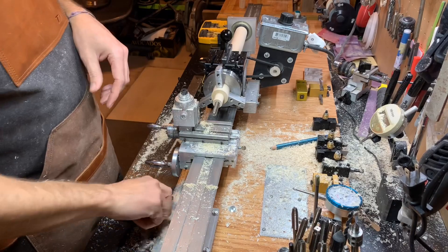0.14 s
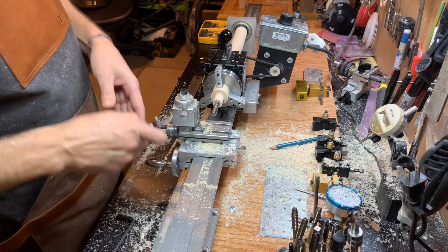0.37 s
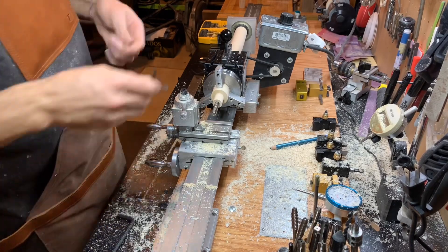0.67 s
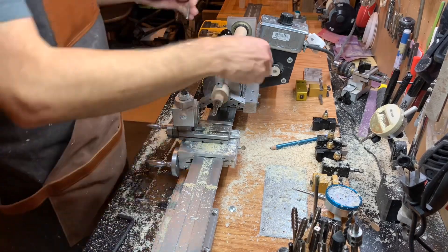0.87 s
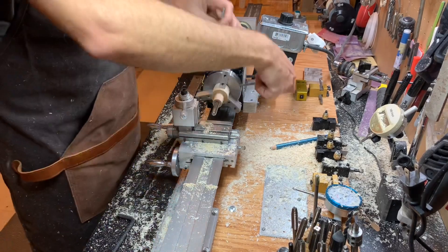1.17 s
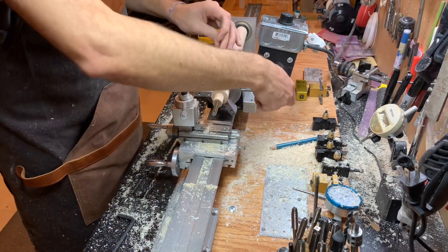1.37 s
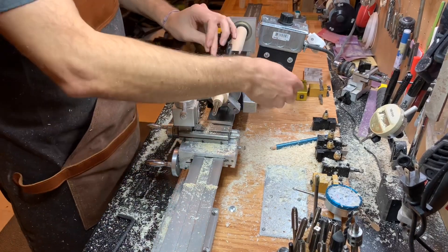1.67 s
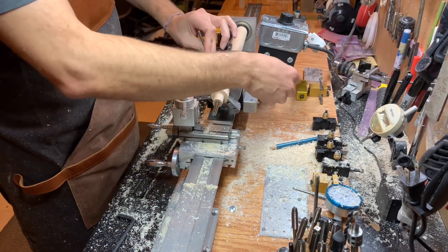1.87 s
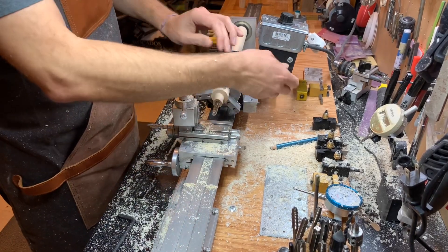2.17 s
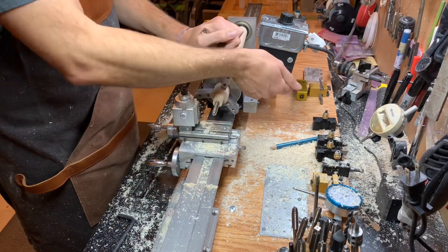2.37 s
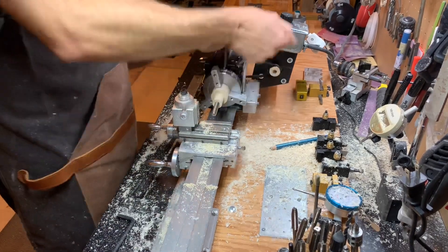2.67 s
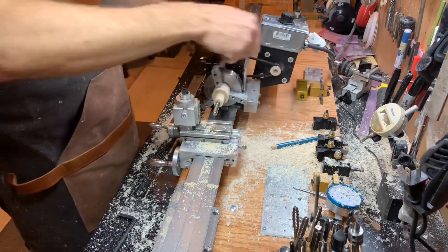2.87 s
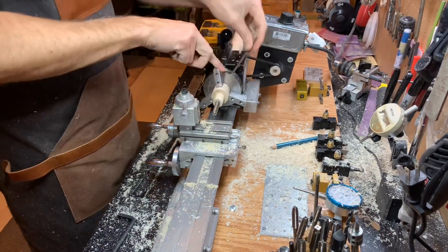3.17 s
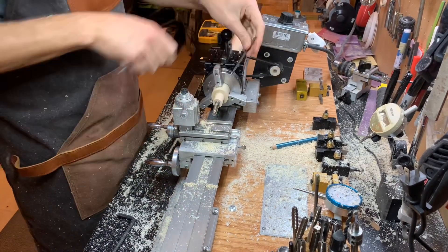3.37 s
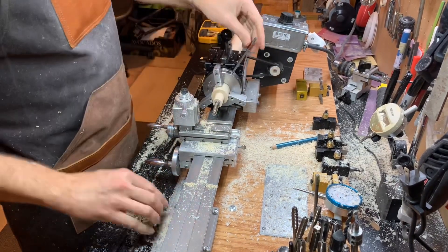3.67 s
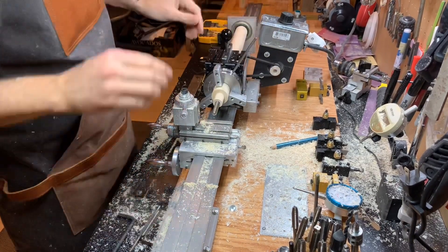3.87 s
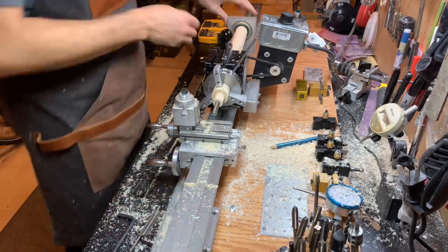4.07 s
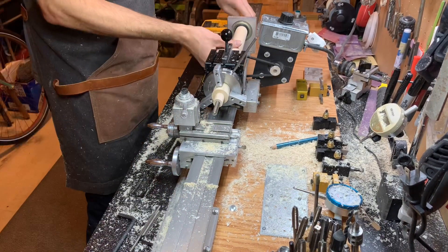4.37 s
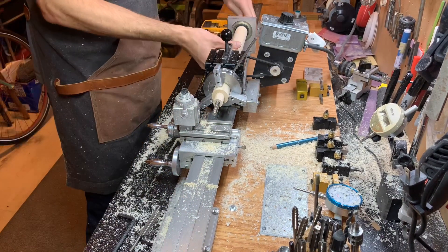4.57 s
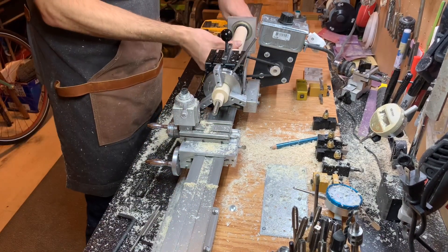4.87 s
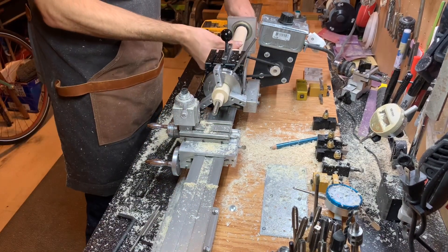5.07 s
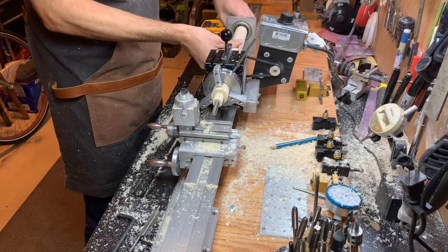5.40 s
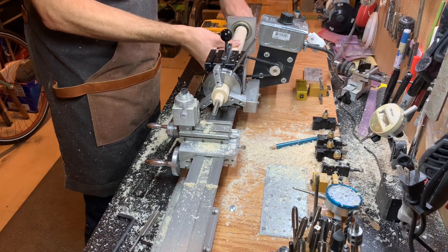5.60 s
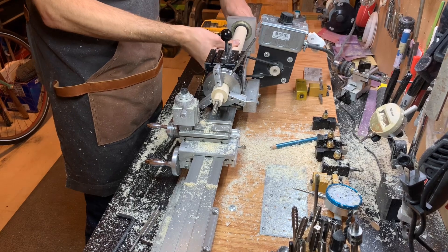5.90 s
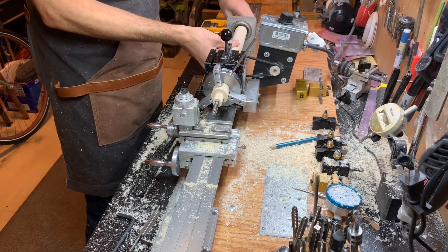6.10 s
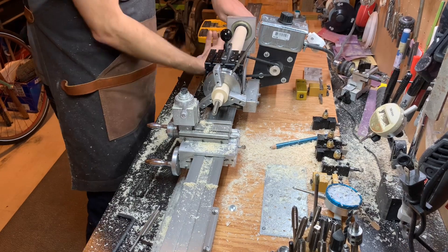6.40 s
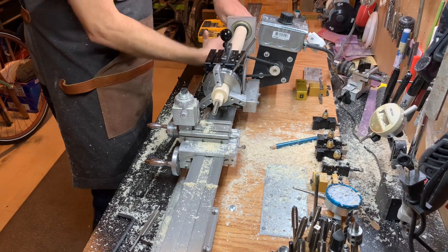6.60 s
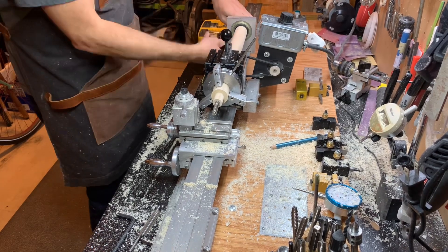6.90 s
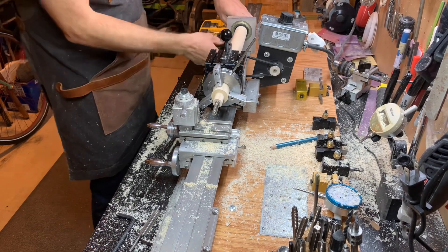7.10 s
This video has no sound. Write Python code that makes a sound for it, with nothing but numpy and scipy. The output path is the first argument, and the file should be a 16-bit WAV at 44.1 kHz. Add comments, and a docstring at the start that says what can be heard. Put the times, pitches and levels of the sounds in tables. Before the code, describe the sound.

Sharp metallic clacks and small clicks at a workbench, then a heavy bump, ticking and a loose hollow object rattling slowly to rest.

```python
"""A small, dry workshop, one microphone just above a cluttered lathe bench; a soft hum runs throughout.
First steel clacks, the frame knocks, hands and apron brush past, and light parts click on the spindle.
Then a bump shakes the bench: the spindle ticks, and a loose thing rattles and rocks on until it rests.
Meanwhile comes the hardest clack, then scrapes and a strong rub; late on, the bench shakes and ticks again.
Hits are noise bursts, partials or falling tones through resonant bodies; rubs and rumble are shaped noise."""
import sys
import numpy as np
from scipy import signal
from scipy.fft import rfft, irfft, next_fast_len
from scipy.io import wavfile
from scipy.ndimage import map_coordinates

SR = 44100
rng = np.random.default_rng(int(sys.argv[2]) if len(sys.argv) > 2 else 0)


def digitize_waveform(pressure):
    """Quantize a signal to 16-bit integers and store it at the path in sys.argv[1].

    Rows of a 2-D input are taken as channels; values are limited to [-1, 1].
    """
    field = np.atleast_2d(pressure).T
    bounded = np.clip(field, -1, 1)
    quanta = np.round(bounded * 32767).astype(np.int16)
    wavfile.write(sys.argv[1], SR, quanta)


N = 319725

# Levels are relative: each layer has a further gain. A hit's level is that of its main band over its
# first 20 ms, and its other registers are in dB relative to that band.

# Steady hum. Each row: frequency in Hz, rms level in dB.
HUM = [(120, -66.5), (240, -71), (479.5, -63.5)]
# Colour of the room's air noise. Each row: frequency in Hz, level in dB.
AIR_COLOUR = [(15, -63.5), (25, -27), (134, -2.5), (212, -11), (242, -8.5), (277, -20.5), (326, -10.5),
              (373, -20.5), (476, -18.5), (516, -20.5), (796, -28.5), (2350, -34.5), (8830, -43),
              (11900, -44.5), (16000, -45)]
# Resonances of the room. Each row: frequency in Hz, width in Hz, lift in dB.
ROOM_MODES = [(128, 30, 2.12), (239, 64, 3), (486, 30, 1.3), (683, 70, 4.5)]
# Dying away of the room. Each row: frequency in Hz, time to fall 60 dB in seconds.
ROOM_DECAY = [(100, 0.51), (400, 0.2), (1000, 0.21), (3000, 0.17), (7500, 0.18), (15000, 0.14)]

# The bench shudders. Each row: start in seconds, attack in seconds, hold in seconds, release in dB per
# second, rumble in dB, clatter in dB relative to it, sifting chips in dB relative to it.
SHUDDERS = [(2.56, 0.034, 0.076, 26.5, -35.5, -10, -12), (3.79, 0.071, 0.34, 172, -47, -4, -6),
            (6.6, 0.17, 0.081, 31.6, -54, 0.5, -2.5)]
# Colour of the bench's rumble. Each row: frequency in Hz, level in dB.
RUMBLE_COLOUR = [(25, -21.5), (60, -6), (120, -12), (230, 7), (300, -1.5), (420, 5.5), (600, -21),
                 (1200, -52.5)]
# Colour of the clutter. Each row: frequency in Hz, level in dB.
CLATTER_COLOUR = [(300, -31), (520, 5), (680, 0), (1000, 9), (1600, -10), (2100, -28.5), (4000, -28.5)]
# Colour of loose chips. Each row: frequency in Hz, level in dB.
CHIPS_COLOUR = [(900, -19), (2000, 2.5), (4000, -1.5), (6500, -4), (10000, -8), (16000, -13)]

# Strokes of hands and apron. Each row: start in seconds, attack in seconds, hold in seconds,
# release in dB per second, rustle in dB, hiss in dB relative to it.
STROKES = [(0.29, 0.06, 0.03, 191, -71, 5.5), (0.505, 0.04, 0.28, 100, -69, 0),
           (2.19, 0.012, 0.1, 50, -63.5, 0.5), (2.472, 0.03, 0.018, 200, -61.5, -1),
           (3.326, 0.14, 0.047, 297.5, -61, 0.5), (3.745, 0.034, 0.073, 305, -58.5, 0.5),
           (4.085, 0.043, 0.055, 220.5, -39, 1.5), (4.652, 0.046, 0.11, 40, -65, -6),
           (5.23, 0.033, 0.13, 97, -68.5, -2.5), (6.203, 0.049, 0.12, 78, -60.5, -3.5),
           (6.508, 0.047, 0.01, 222, -53.5, 0.5), (6.612, 0.015, 0.01, 168, -50.5, -3),
           (6.753, 0.031, 0.029, 283, -51, 4)]
# Colour of the coarse rustle. Each row: frequency in Hz, level in dB.
RUSTLE_COLOUR = [(700, -18), (1500, 0), (2200, -1), (3500, -3), (5000, -3), (6500, -7.5), (9000, -17.5),
                 (14000, -43)]
# Colour of the fine hiss. Each row: frequency in Hz, level in dB.
HISS_COLOUR = [(3500, -21), (6500, 0), (8500, -3), (11000, -1.5), (14500, -2.5), (16000, -8.5)]
# Resonances in the rustle. Each row: frequency in Hz, width in Hz, lift in dB.
RUB_MODES = [(2420, 250, 2.5), (3630, 1100, 4.9), (4880, 350, 1.13), (6180, 900, 2.6)]

# Short gritty scrapes. Each row: start in seconds, level in dB, body in dB, top in dB.
SCRAPES = [(0.1124, -41, 4, -2), (0.898, -53, 2, -6), (1.001, -51, 7, -15), (1.787, -51, 1, -7),
           (3.8681, -32.5, -5.5, -17), (3.9477, -32.5, -8, -12.5), (4.0011, -28.5, -4, -17.5),
           (4.06, -41, -22, -20), (5.4855, -51.5, 0.5, -7), (6.6272, -53.5, 7.5, 8.5)]
# Colour of grit. Each row: frequency in Hz, level in dB.
GRIT_COLOUR = [(150, -36), (250, -9), (330, -9.5), (444, -6.5), (890, -11.5), (1260, -12), (1350, -10),
               (2130, -2), (3280, -7), (5930, -11.5), (16000, -20)]
# Resonances of grit and chips. Each row: frequency in Hz, width in Hz, lift in dB.
GRIT_MODES = [(1530, 160, 1), (2250, 500, 2.8), (3400, 170, 3)]

# Soft bumps on the bench. Each row: start in seconds, level in dB, knock in dB, leading mode in Hz.
BUMPS = [(2.563, -24, -8.5, 159), (2.604, -34.5, -8, 115), (2.686, -40, -7, 205), (2.807, -33, -1, 220),
         (3.927, -32, -20, 114), (3.954, -41, -5, 149), (6.629, -34.5, -17, 118), (6.668, -44, -22, 106),
         (6.761, -45.5, 4.5, 162), (6.80, -42.5, -2.5, 149), (7.054, -41.5, -7, 157), (7.09, -51.5, 3, 116)]
# Colour of the bench top. Each row: frequency in Hz, level in dB.
BENCH_COLOUR = [(35, -22), (60, -11), (110, -2.5), (200, -3), (400, 7.5), (800, -6)]
# Resonances of the bench top. Each row: frequency in Hz, width in Hz, lift in dB.
BENCH_MODES = [(66.7, 9.2, 7.6), (112.6, 25, 9.2), (165.1, 16.3, 7.4), (222, 35, 1.4), (376, 28, 3.7)]
# Partials of the bench top. Each row: frequency in Hz, level in dB, time to fall 60 dB in seconds.
BENCH_RING = [(107, -5.5, 0.13), (164, -10, 0.069), (226.6, 11, 0.031)]

# Dull knocks on the frame. Each row: start in seconds, level in dB, body in dB, edge in dB.
KNOCKS = [(0.119, -42, 4, 6), (1.015, -35, 0.5, -6), (1.367, -46.5, -2, -7), (1.384, -48, 9, -13),
          (1.742, -46.5, -2, -4), (1.793, -45.5, 7.5, 0), (4.0021, -37, -7, 4), (5.3698, -31.5, -2, -11.5),
          (6.11, -38.5, -4, -15), (7.089, -50, 7.5, 2), (7.245, -47.5, -19, 5.5)]
# Colour of the lathe's frame. Each row: frequency in Hz, level in dB.
FRAME_COLOUR = [(150, 18.5), (300, -2), (700, 1.5), (1050, 1), (1300, -19.5), (1550, -19), (2300, -16.5),
                (2900, -26), (6000, 2)]
# Resonances of the frame. Each row: frequency in Hz, width in Hz, lift in dB.
FRAME_MODES = [(317.6, 50, 18.5), (498, 33, 7.5), (655, 99, 13), (1054, 31.4, 5), (1130, 15, 1.5),
               (1542, 280, 8), (1782, 32, 7), (2287, 120, 4.5), (3290, 130, 2.5), (5850, 345, 2),
               (6000, 70, 4), (7300, 120, 5.5), (7220, 120, -0.5)]
# Partials of the frame. Each row: frequency in Hz, level in dB, time to fall 60 dB in seconds.
FRAME_RING = [(336, -11, 0.06), (645, 1.5, 0.26), (1050, -4, 0.067), (1070, -6, 0.053), (1500, -13, .09),
              (2220, 8, 0.21)]

# Turns of the spindle. Each row: first tick in seconds, length in seconds, level in dB,
# fade in dB per second, ring in dB, top in dB.
TURNS = [(2.6617, 0.04, -30, 0, 0, -1.5), (2.762, 0.5, -29.5, 28, -1, -13),
         (6.7576, 0.345, -34, 15, -0.5, -13)]
TICK_GAP_S = 0.0768
REBOUND_S, REBOUND_DB = 0.0145, -12.5  # a lighter touch follows each tick
# Colour of a tick. Each row: frequency in Hz, level in dB.
TICK_COLOUR = [(1000, -6), (2500, -9), (4000, -3.5), (7700, -3.5), (8600, -13), (16000, -7)]
# Resonances of a tick. Each row: frequency in Hz, width in Hz, lift in dB.
TICK_MODES = [(1415, 110, 16), (2220, 50, 2), (3800, 440, 12.6), (4200, 110, 2), (4850, 520, 7.9),
              (8000, 250, 2.3)]

# The loose thing is thrown about. Each row: landing in seconds, level in dB, body in dB.
ROCKS = [(2.6307, -25, -22), (2.6878, -27.5, -9), (2.7277, -20.5, -1), (2.7985, -23, -11),
         (2.8464, -21.5, -1.5), (2.8524, -32.5, 7.5), (2.9326, -27, 1.5), (2.9911, -37, -5),
         (3.0758, -28, -2.5), (3.1235, -37, -4), (3.1936, -33.5, -4.5), (3.259, -41.5, 3)]
# Then it settles, rocking from side to side: first landing, first gap, what each gap loses
SETTLE_S, SETTLE_GAP_S, SETTLE_QUICKEN_S = 3.3263, 0.0585, 0.0006
SETTLE_DB, SETTLE_FADE_DB_PER_S, LIGHT_SIDE_DB, SETTLE_BODY_DB = -40, 7.5, -3, 3.5
# Colour of the hollow thing. Each row: frequency in Hz, level in dB.
HOLLOW_COLOUR = [(300, 3.5), (750, -11), (1200, -7), (1700, -3), (2200, -8.5), (5000, -23)]
# Resonances of hollow things. Each row: frequency in Hz, width in Hz, lift in dB.
HOLLOW_MODES = [(460, 29, 11), (687, 320, 16.4), (1260, 194, 6.1), (1620, 180, 7.5)]

# Light steel parts against the spindle. Each row: start in seconds, level in dB, knock in dB,
# clank in dB, top in dB, main ring in Hz.
CLICKS = [(0.846, -35, -4, -1.5, 7, 6900), (1.017, -27, -2, -5, 1.5, 5530),
          (1.1851, -33, -1.5, -7.5, -3, 5700), (1.309, -32, -15, -9, -6.5, 7700),
          (1.356, -38.5, 0.5, -8, -2, 7600), (1.8019, -30, 5, -9, -2, 5750)]
# Colour of light steel. Each row: frequency in Hz, level in dB.
TINKLE_COLOUR = [(120, -6), (300, 13.5), (650, 9.5), (1400, -2), (3000, -7), (4500, -6), (6000, 0),
                 (8700, -19), (10000, -20.5), (11500, -33), (16000, -27)]

# Heavy steel on steel. Each row: start in seconds, level in dB, knock in dB, clank in dB, top in dB,
# time for the contact to fall 60 dB in seconds.
CLACKS = [(0.0322, -8.5, -6.5, -1.5, 1.8, 0.013), (0.1587, -54, -6, -12, 27.3, 0.044),
          (2.5636, -26, 11, 6, 0.9, 0.21), (2.606, -21.5, -2, -13, 11.5, 0.028),
          (3.5309, 0, -11, -4.5, 0.49, 0.076)]
# Colour of heavy steel. Each row: frequency in Hz, level in dB.
STEEL_COLOUR = [(120, -3), (300, -4), (800, -7.5), (1500, -2), (2700, 1.5), (4200, -9.5), (5800, 0),
                (8000, 0), (9200, -4), (10500, -11), (13000, -2.5), (15000, -4), (16000, 4)]
# Partials of the steel parts. Each row: frequency in Hz, level in dB, time to fall 60 dB in seconds.
STEEL_RING = [(1813, -4, 0.12), (2120, -2, 0.26), (2890, -10.5, .15), (5790, -9.5, 0.13), (5990, -4.5, .17),
              (5810, -4, .17), (6040, 3.5, .17), (7270, 2.5, 0.15), (7630, 9, 0.17), (7900, 2.5, 0.17),
              (8040, -13.5, .17), (13140, -2.5, .14)]
STEEL_BANDS = [(3500, 10000), (200, 900), (900, 3500), (10000, 17000)]  # Hz: main, knock, clank, top

TOP_HZ = 15850  # the recorder's band limit


def amp(db):
    """Decibels to gain."""
    return 10 ** (np.asarray(db) / 20)


def unit(x):
    """Scale to rms 1."""
    return x / np.sqrt(np.mean(x ** 2) + 1e-20)


def along(points, hz):
    """Read (Hz, value) points on a log frequency axis."""
    f, v = np.transpose(points)
    return np.interp(np.log(hz + 1), np.log(f + 1), v)


def wobble(rate):
    """A smooth random curve with the given number of knots a second."""
    knots = rng.standard_normal(int(N * rate / SR) + 4)
    return map_coordinates(knots, [np.arange(N) * rate / SR])


def envelope(start, attack, hold, release_db_per_s):
    """A gain that rises, holds and then fades evenly in dB."""
    t = np.arange(N) / SR - start
    fade = amp(-abs(release_db_per_s) * np.maximum(t - attack - hold, 0))
    return np.clip(t / attack, 0, 1) * fade


def body(colour, modes, size=8192):
    """Causal, minimum-phase impulse response of a broad colour lifted by resonances."""
    hz = np.fft.rfftfreq(size, 1 / SR)
    db = along(colour, hz)
    db = db + sum(lift / (1 + (2 * (hz - f) / width) ** 2) for f, width, lift in modes)
    cepstrum = irfft(np.log(amp(db)))
    # folding the cepstrum forward in time makes the response causal
    cepstrum[1:size // 2] *= 2
    cepstrum[size // 2 + 1:] = 0
    return irfft(np.exp(rfft(cepstrum)))[:size // 2]


def bounced(response, echo_db, count=5):
    """The bench top and nearby clutter return a few close echoes."""
    echoes = np.zeros(SR // 160)
    delays = rng.integers(SR // 1000, len(echoes), count)
    echoes[delays] = amp(echo_db) * rng.choice([-1, 1], count)
    echoes[0] = 1  # the direct sound
    return signal.fftconvolve(response, echoes)


def noise(colour, modes, grain_db, echo_db=-60):
    """Coloured noise of rms 1 whose strength varies rapidly from grain to grain."""
    grains = rng.standard_normal(N) * amp(grain_db * wobble(300))
    response = bounced(body(colour, modes), echo_db)
    return unit(signal.fftconvolve(grains, response)[:N])


def contact(t60, attack, room_db):
    """A dense burst of micro-impacts, followed by the answer of the room."""
    t = np.arange(SR // 3) / SR
    hz, frame_s, bins = signal.stft(rng.standard_normal(len(t)), SR, nperseg=256)
    decay = amp(-60 * frame_s / along(ROOM_DECAY, hz)[:, None])
    tail = signal.istft(bins * decay, SR, nperseg=256)[1][:len(t)]
    tail *= 1 - np.exp(-t / 0.00122)  # the room answers gradually
    burst = rng.standard_normal(len(t)) * amp(-60 * t / t60)
    return (burst + amp(room_db) * tail) * (1 - np.exp(-t / attack))


def ringing(partials, scatter_db):
    """Freely dying partials, at new strengths for every blow."""
    t = np.arange(SR // 3) / SR
    out = np.zeros(len(t))
    for hz, db, t60 in partials:
        strength_db = db + scatter_db * rng.standard_normal()
        out += amp(strength_db - 60 * t / t60) * np.sin(2 * np.pi * hz * t)
    return out


def blow(s, push, response, bands, db, relative_db):
    """A push rings a body at time s; where and how hard it lands sets the strength of each register."""
    ring = signal.fftconvolve(push, response)[:len(push)]
    out, start = np.zeros(N + SR), round(s * SR)
    for band, lift in zip(bands, [0, *relative_db]):
        edges = np.clip(band, 20, SR / 2 - 100)
        part = signal.sosfilt(signal.butter(3, edges, "band", fs=SR, output="sos"), ring)
        onset = np.std(part[:SR // 50])  # first 20 ms
        out[start:start + len(part)] += amp(db + lift) * part / onset
    return out[:N]


def workshop():
    """Low room noise, and a soft hum whose partials waver in phase."""
    t = np.arange(N) / SR
    hum = np.zeros(N)
    for hz, db in HUM:
        hum += amp(db) * np.sqrt(2) * np.sin(2 * np.pi * hz * t + 0.85 * wobble(15))
    return hum + amp(-53) * noise(AIR_COLOUR, ROOM_MODES, grain_db=0.5)


def shudder():
    """While the bench shakes, its top rumbles, the clutter chatters in fits and loose chips sift."""
    gains = np.zeros((3, N))
    for *shape, db, clatter_db, sift_db in SHUDDERS:
        gains += np.outer(amp(db + np.array([0, clatter_db, sift_db])), envelope(*shape))
    rumble, clatter, sift = gains
    top = amp(-5) * rumble * noise(RUMBLE_COLOUR, BENCH_MODES, grain_db=4.5)
    clutter = amp(-2.5) * clatter * noise(CLATTER_COLOUR, HOLLOW_MODES, grain_db=2.2)
    clutter *= amp(3.0 * wobble(25))  # chatters in fits
    chips = amp(1.0) * sift * noise(CHIPS_COLOUR, GRIT_MODES, grain_db=3.5, echo_db=-11.0)
    return top + clutter + chips


def rubbing():
    """Skin and cloth slide over wood with uneven pressure: a coarse rustle under a fine hiss."""
    gains = np.zeros((2, N))
    for *shape, db, hiss_db in STROKES:
        gains += np.outer(amp([db, db + hiss_db]), envelope(*shape))
    rustle, hiss = gains
    coarse = amp(-3.5) * rustle * noise(RUSTLE_COLOUR, RUB_MODES, grain_db=1.5, echo_db=-13)
    fine = amp(-3.0) * hiss * noise(HISS_COLOUR, [], grain_db=1.5, echo_db=-12.0)
    pressure = amp(1.7 * wobble(30))
    return (coarse + fine) * pressure


def scrapes():
    """A surface catches and slides briefly: a gritty burst of micro-impacts."""
    response = body(GRIT_COLOUR, GRIT_MODES)
    bands = [(1300, 6500), (300, 1300), (6500, 16000)]  # Hz: main, body, top
    out = np.zeros(N)
    for s, db, *rel in SCRAPES:
        push = contact(t60=0.064, attack=0.0003, room_db=2)
        out += blow(s, push, response, bands, db, rel)
    return amp(-6) * out


def bumps():
    """The bench top booms when it is bumped; the spot that is hit decides which mode leads."""
    bands = [(40, 260), (260, 800)]  # Hz: boom, knock
    out = np.zeros(N)
    for s, db, *rel, hz in BUMPS:
        response = body(BENCH_COLOUR, BENCH_MODES + [(hz, 40, 8)])
        push = contact(t60=0.015, attack=0.00074, room_db=-6)
        push += amp(-24.5) * ringing(BENCH_RING, scatter_db=1)
        out += blow(s, push, response, bands, db, rel)
    return amp(-3) * out


def knocks():
    """Softer contacts: one short push, a little buzz, and the frame's low resonances."""
    response = body(FRAME_COLOUR, FRAME_MODES)
    bands = [(550, 1300), (200, 550), (1300, 3000)]  # Hz: main, body, edge
    out = np.zeros(N)
    for s, db, *rel in KNOCKS:
        push = contact(t60=.024, attack=.0008, room_db=-11)
        push += amp(-32) * ringing(FRAME_RING, scatter_db=2)
        push[:24] += 2 * np.hanning(24)  # the short push
        out += blow(s, push, response, bands, db, rel)
    return amp(-6) * out


def ticks():
    """Light, ringing ticks of the turning spindle, evenly spaced, each with a small rebound."""
    response = body(TICK_COLOUR, TICK_MODES)
    bands = [(3000, 8000), (1200, 3000), (8000, 16000)]  # Hz: main, ring, top
    out = np.zeros(N)
    for start, length, db, fade, *rel in TURNS:
        for since in np.arange(0, length, TICK_GAP_S):
            touch_db = 2 * rng.standard_normal()
            rebound_db = REBOUND_DB + 3 * rng.standard_normal()
            for delay, lift in [(0, touch_db), (REBOUND_S, rebound_db)]:
                push = contact(t60=0.033, attack=0.00039, room_db=-16.5)
                out += blow(start + since + delay, push, response, bands, db - fade * since + lift, rel)
    return amp(-14) * out


def tock(start_hz, end_hz, fall, t60):
    """Bending waves in a thin wall: the high ones arrive first, so the pitch drops."""
    t = np.arange(SR // 3) / SR
    hz = end_hz + (start_hz - end_hz) * np.exp(-t / fall)
    tone = np.sin(2 * np.pi * np.cumsum(hz) / SR)
    return tone * (1 - np.exp(-t / .001)) * amp(-60 * t / t60)


def settling(count=35, scatter_db=2.0):
    """Landings (s, dB, body dB) of the dying rocking: heavy side and light side in turn."""
    k = np.arange(count)
    since = SETTLE_GAP_S * k - SETTLE_QUICKEN_S * k * (k - 1) / 2
    db = SETTLE_DB - SETTLE_FADE_DB_PER_S * since + LIGHT_SIDE_DB * (k % 2)
    chance = scatter_db * rng.standard_normal((count, 2))
    body_db = SETTLE_BODY_DB + 2 * chance[:, 1]
    return list(zip(SETTLE_S + since, db + chance[:, 0], body_db))


def rocking():
    """Each landing of the loose thing is a hollow tock at a new pitch; harder ones chatter more."""
    response = body(HOLLOW_COLOUR, HOLLOW_MODES)
    bands = [(900, 2200), (450, 900)]  # Hz: main, body
    out = np.zeros(N)
    for s, db, *rel in ROCKS + settling():
        pitch = np.exp(.09 * rng.standard_normal())
        wave = tock(start_hz=1400 * pitch, end_hz=760 * pitch, fall=0.006, t60=.026)
        chatter = amp(.5 * (db + 45)) * contact(t60=0.042, attack=0.0006, room_db=-7.5)
        out += blow(s, wave + chatter, response, bands, db, rel)
    return amp(-13.5) * out


def clicks():
    """Small steel parts touch; each sings at its own pitch over the frame's knock."""
    out = np.zeros(N)
    for s, db, *rel, hz in CLICKS:
        response = body(TINKLE_COLOUR, FRAME_MODES + [(hz, 520, 8)])
        push = contact(t60=0.023, attack=0.00021, room_db=-10.5)
        out += blow(s, push, response, STEEL_BANDS, db, rel)
    return amp(-14.5) * out


def clacks():
    """Steel parts meet with a sharp crack, ring, and shake the lathe's frame."""
    response = body(STEEL_COLOUR, FRAME_MODES)
    out = np.zeros(N)
    for s, db, *rel, t60 in CLACKS:
        push = contact(t60, attack=.0002, room_db=5)
        push += amp(-33) * ringing(STEEL_RING, scatter_db=3)
        push[:64] += amp(11.5) * rng.standard_normal(64)  # the first crack
        out += blow(s, push, response, STEEL_BANDS, db, rel)
    return amp(-22.0) * out


def scene():
    """Everything reaches one microphone just above the bench."""
    background = workshop() + shudder() + rubbing()
    hits = scrapes() + bumps() + knocks() + ticks() + rocking() + clicks() + clacks()
    return (background + hits)[None]


def record(dry):
    """The recorder cuts steeply above its band limit."""
    size = next_fast_len(N + SR // 2)
    hz = np.fft.rfftfreq(size, 1 / SR)
    low_pass = 1 / (1 + (hz / TOP_HZ) ** 120)
    return irfft(rfft(dry, size) * low_pass, size)[..., :N]


dry = scene()
out = record(dry)
digitize_waveform(out)
```